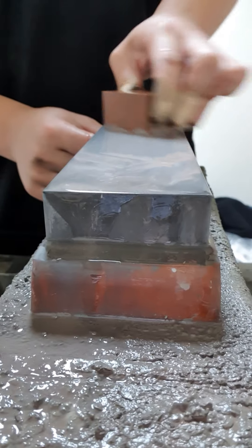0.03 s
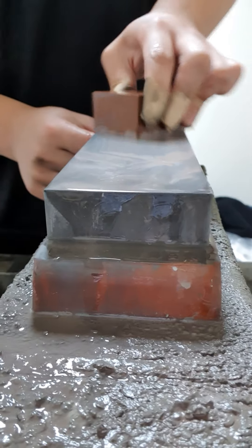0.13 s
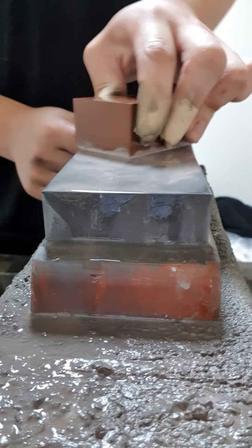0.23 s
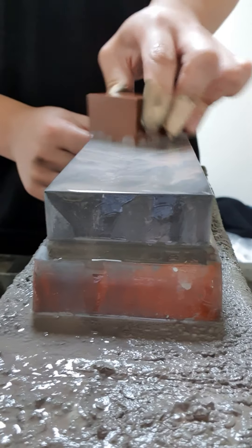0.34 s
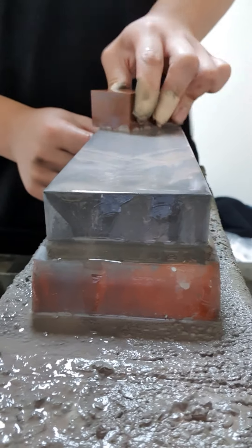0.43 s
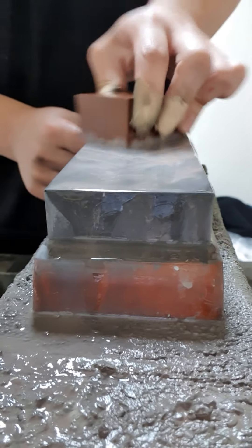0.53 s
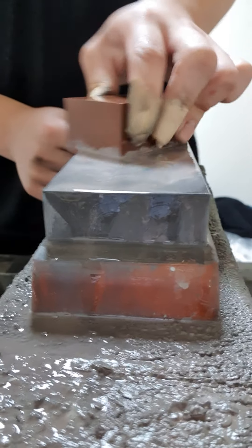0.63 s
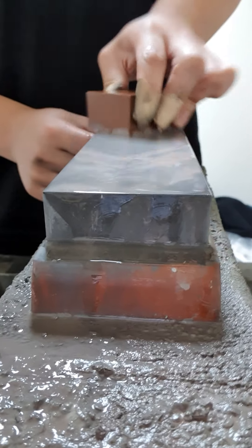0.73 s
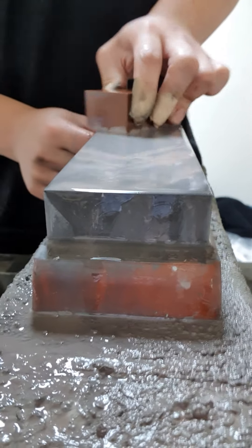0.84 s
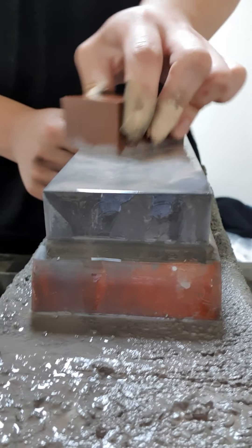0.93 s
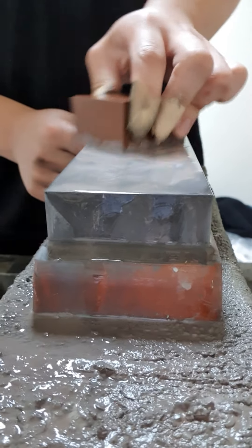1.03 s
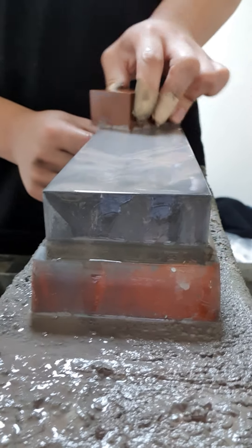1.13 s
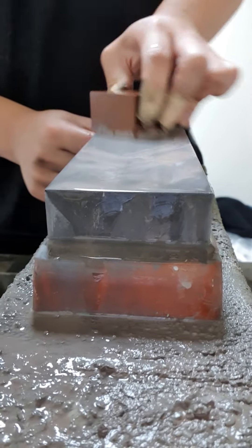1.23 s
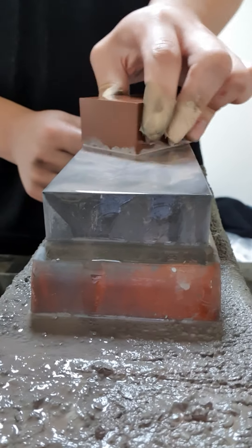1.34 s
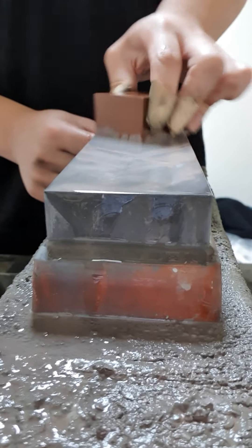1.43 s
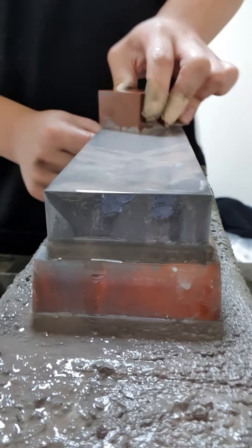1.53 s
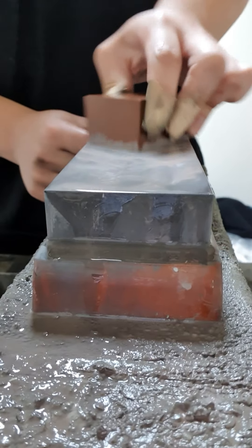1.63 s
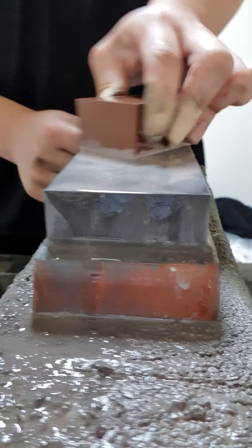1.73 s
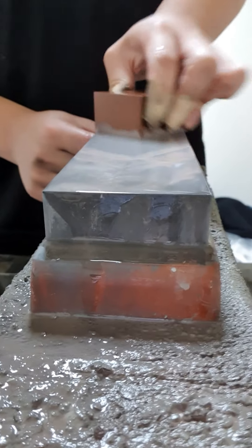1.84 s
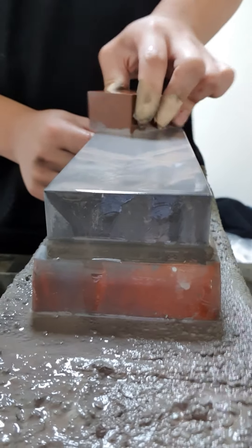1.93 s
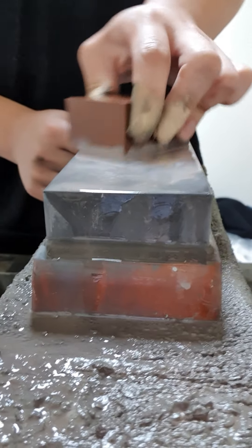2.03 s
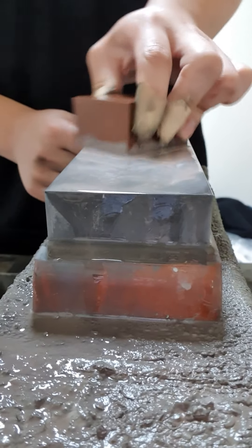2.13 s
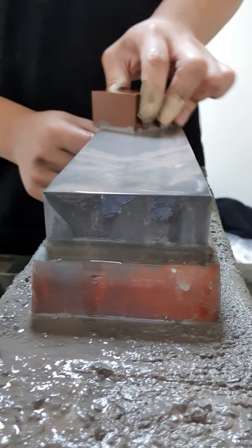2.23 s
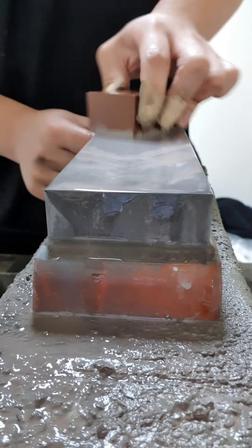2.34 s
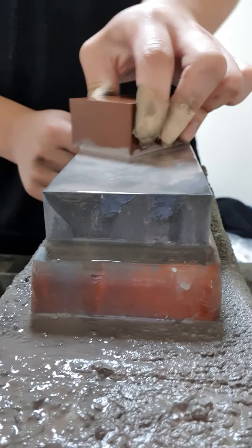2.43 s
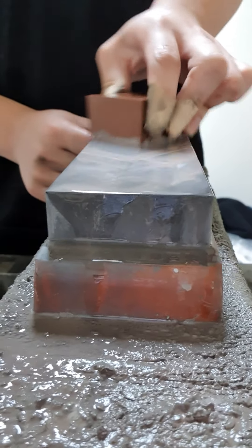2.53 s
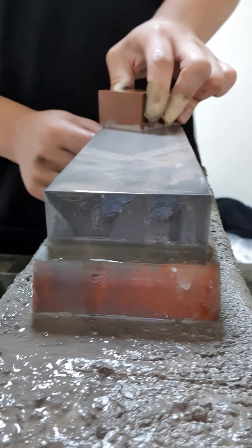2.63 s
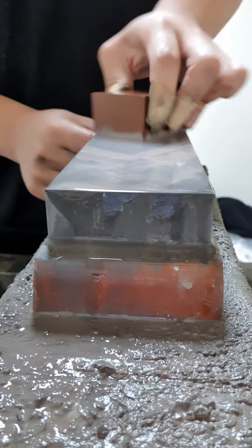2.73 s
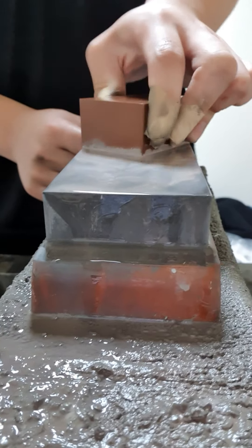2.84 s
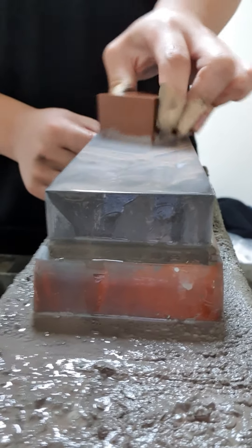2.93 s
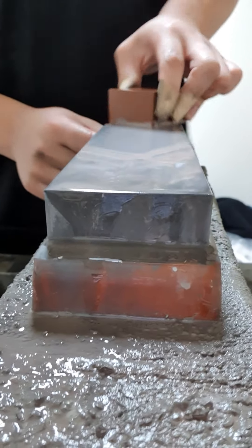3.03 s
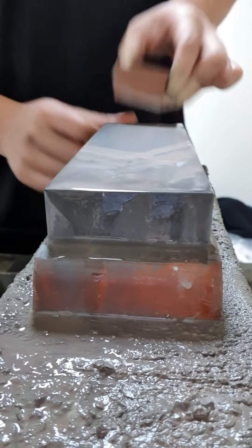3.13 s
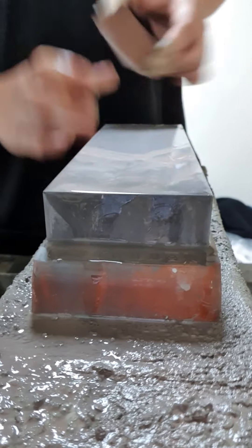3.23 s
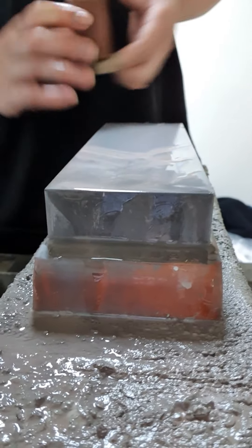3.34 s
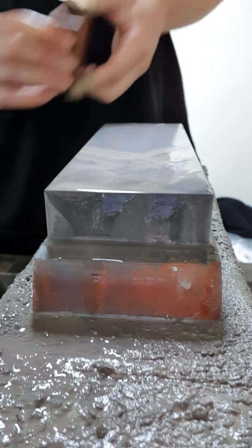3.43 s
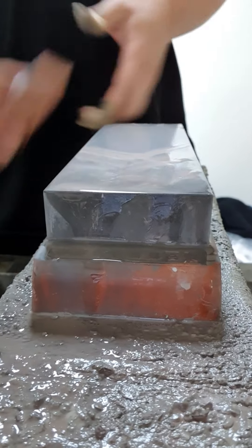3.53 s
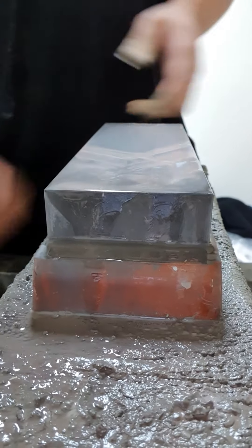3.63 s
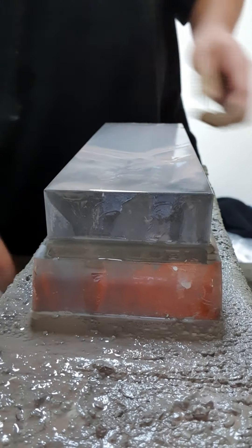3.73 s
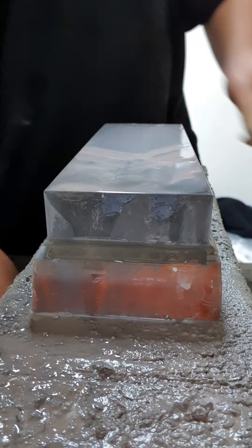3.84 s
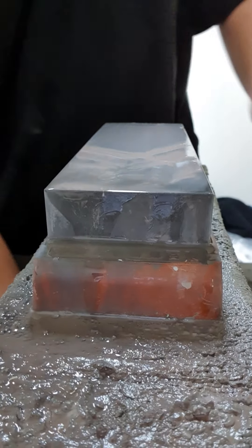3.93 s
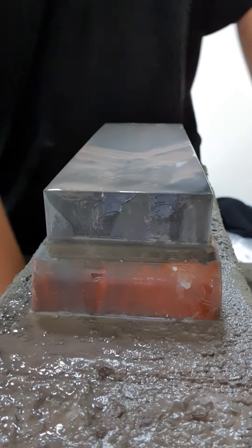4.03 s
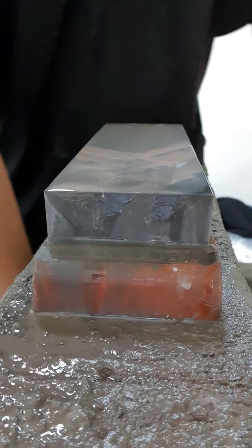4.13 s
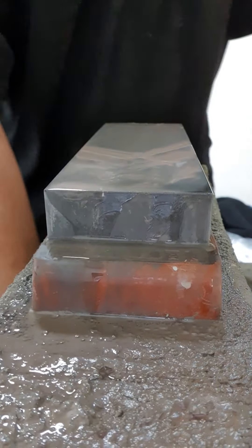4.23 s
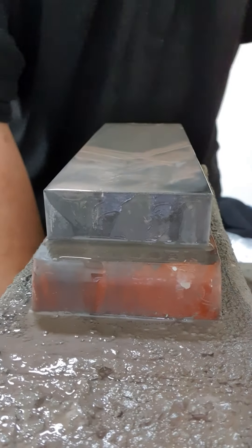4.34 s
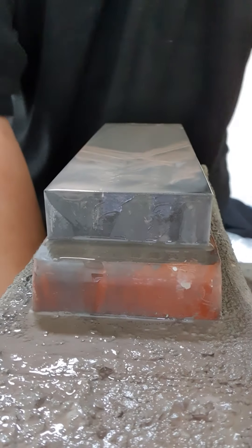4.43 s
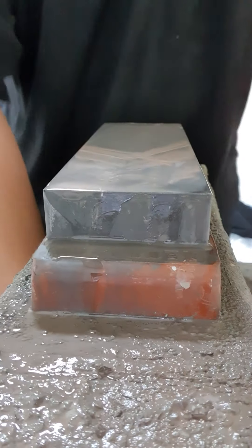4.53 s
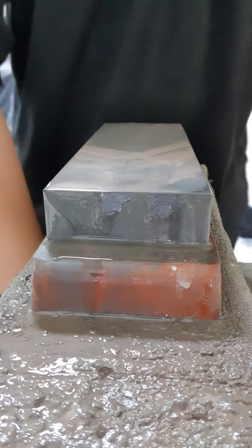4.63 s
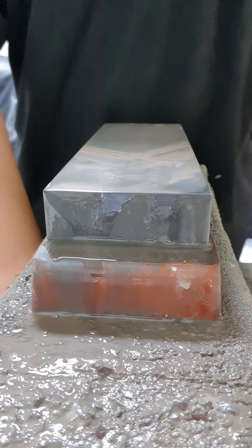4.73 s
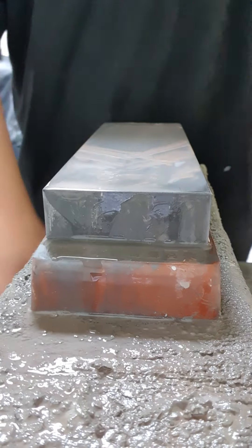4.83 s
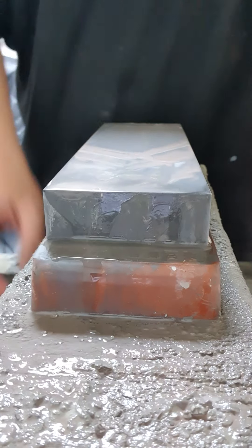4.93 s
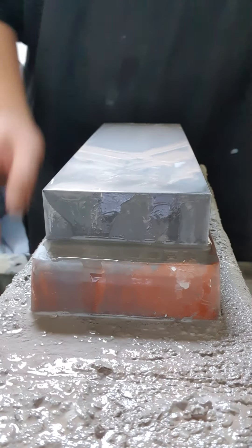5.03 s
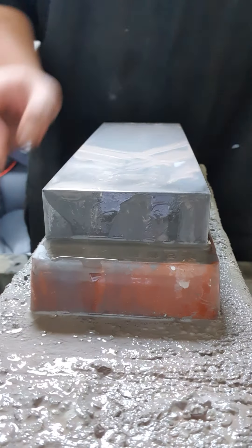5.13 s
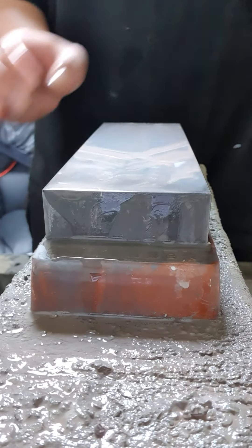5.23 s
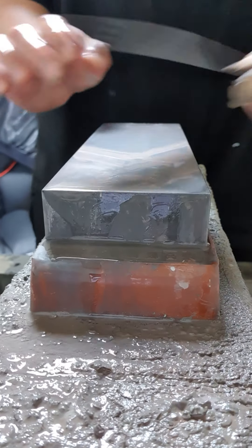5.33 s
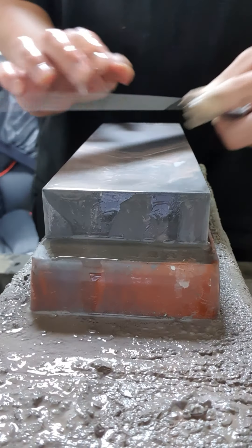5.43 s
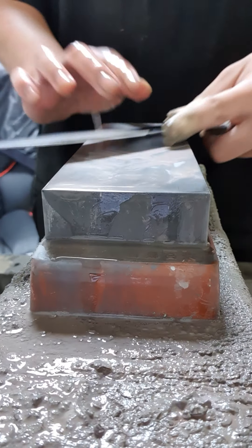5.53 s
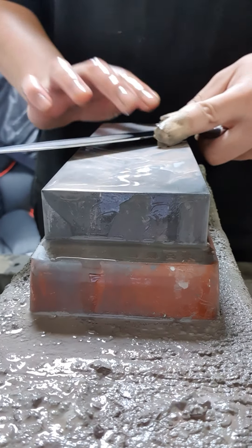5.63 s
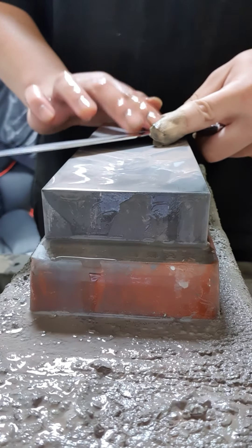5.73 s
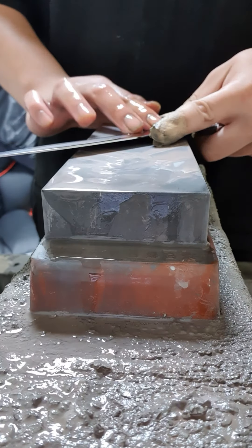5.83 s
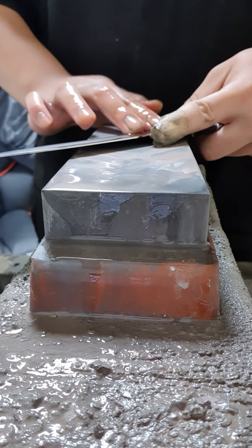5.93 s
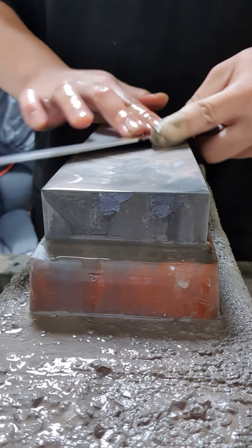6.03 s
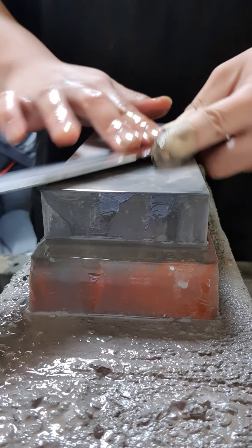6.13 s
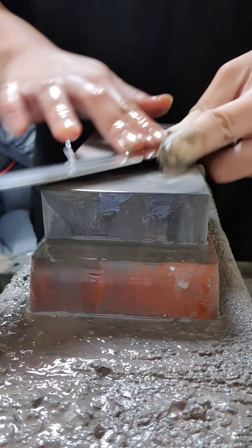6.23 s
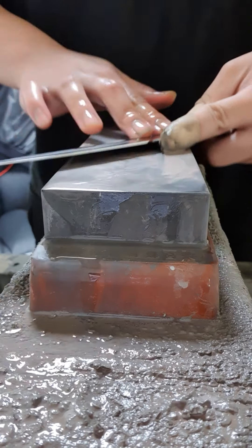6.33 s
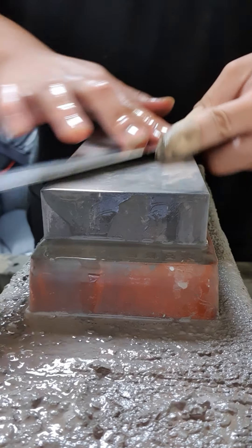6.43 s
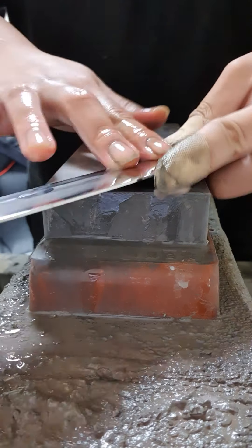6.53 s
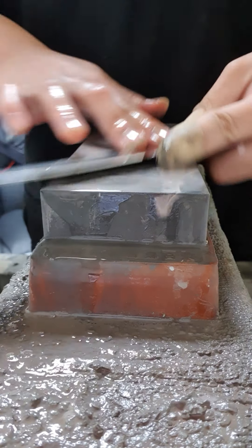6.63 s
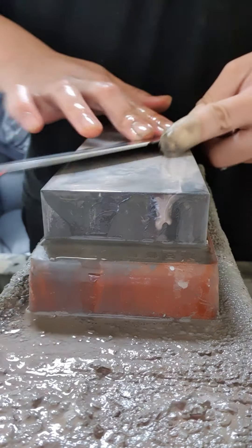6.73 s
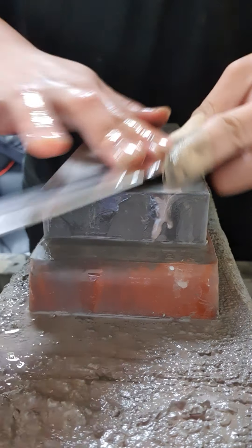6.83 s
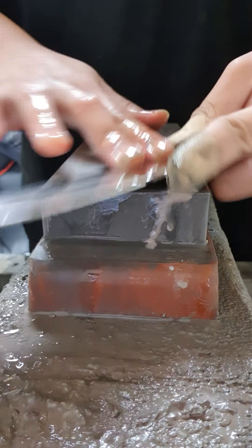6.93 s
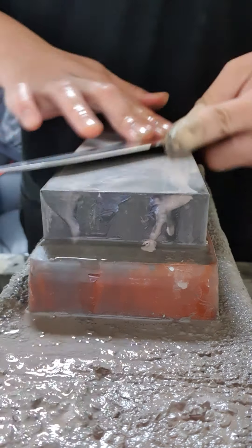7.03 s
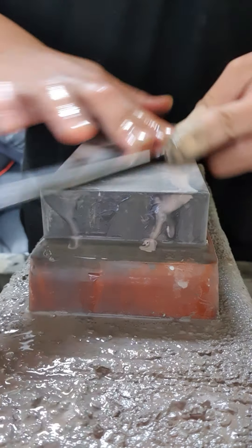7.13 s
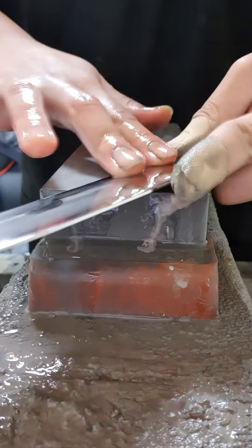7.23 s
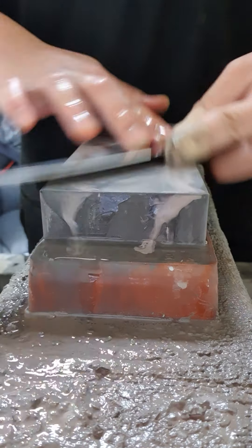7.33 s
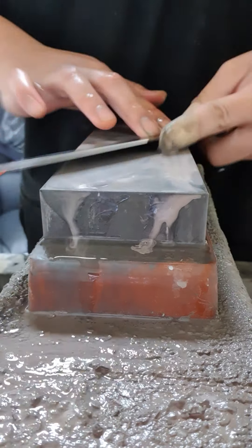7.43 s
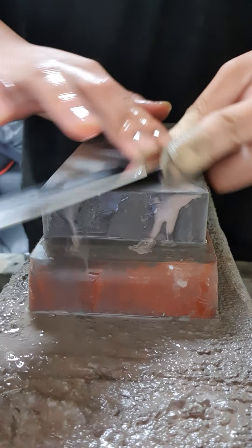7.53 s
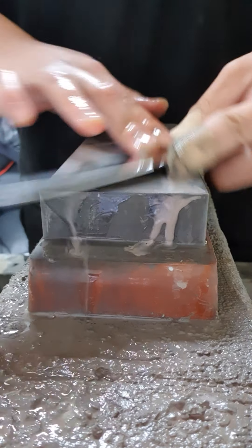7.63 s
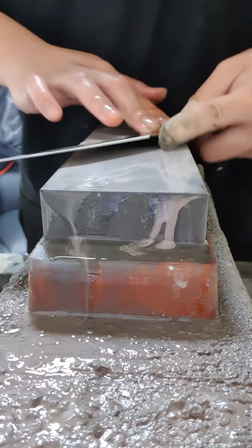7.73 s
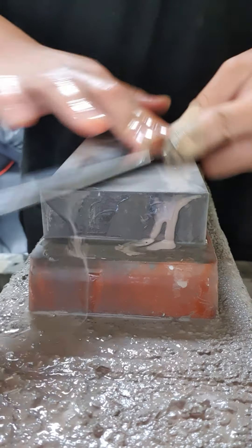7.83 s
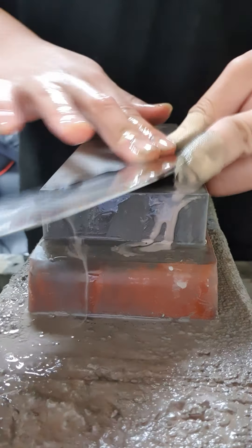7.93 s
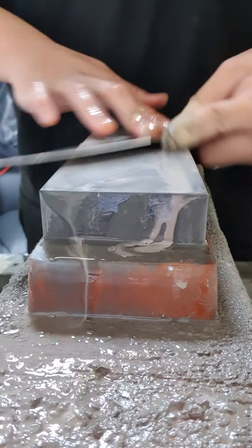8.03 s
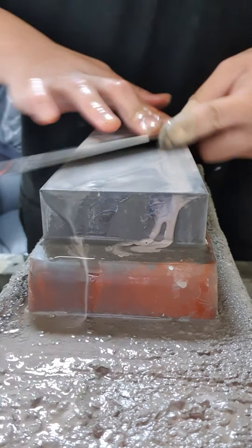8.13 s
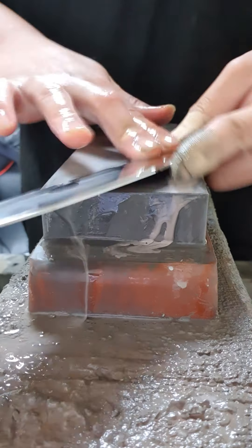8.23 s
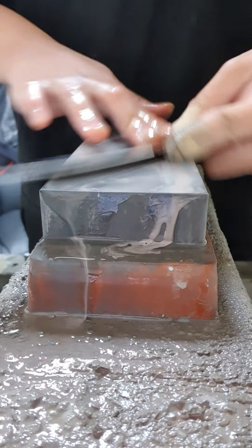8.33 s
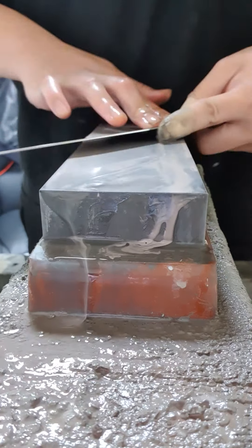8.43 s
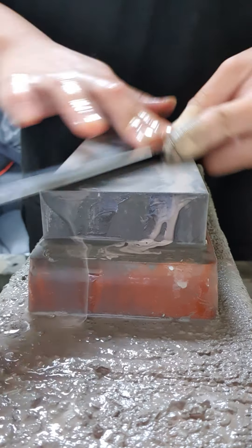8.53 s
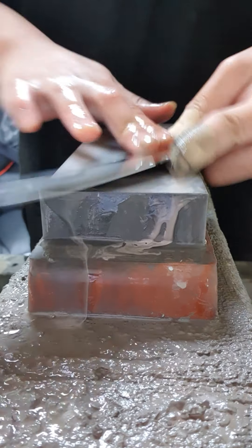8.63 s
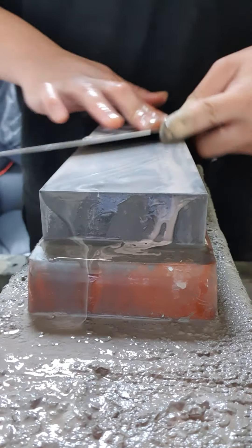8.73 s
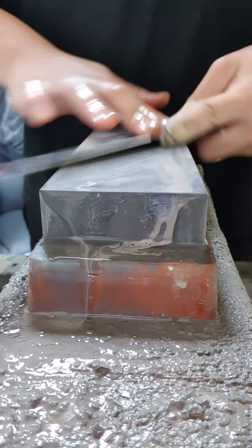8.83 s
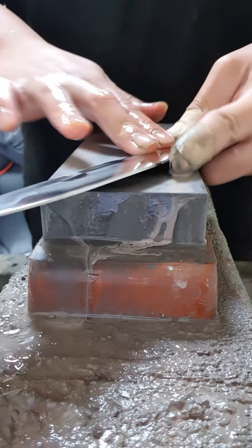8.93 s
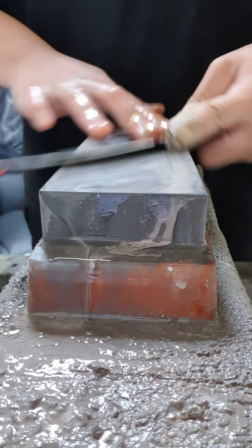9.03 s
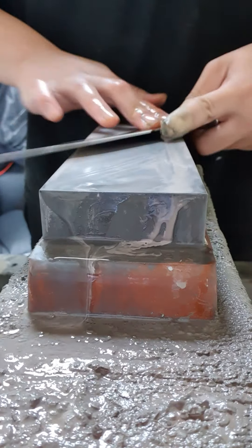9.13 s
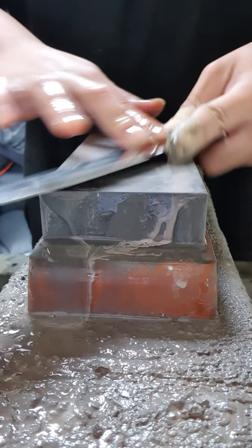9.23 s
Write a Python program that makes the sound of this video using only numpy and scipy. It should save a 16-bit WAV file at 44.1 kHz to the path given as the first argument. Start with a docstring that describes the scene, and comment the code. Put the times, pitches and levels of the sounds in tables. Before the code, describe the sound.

Close up in a small quiet room, steady gritty scrubbing of stone on stone runs about six strokes a second, heavier on alternate strokes. A lull follows with soft rustling, a barely audible thin squeak and one dull woody boom. A steel blade then rasps quickly over the wet stone, sharp and sizzling with a slight metallic ring, continuing to the end in dry-sounding close stereo.

```python
"""A small dressing stone rubs over a wet whetstone: grains fracture in coarse grinding and hissing slurry.
It is lifted off; wet hands swish, rub and touch things, a faint squeak sinks, and a thud rings the bench's modes.
Then a kitchen knife is honed in quick strokes: grit scratches the steel and rings the blade, the edge bites,
and the stone rumbles on its base. A low room tone lies under it all, heard at two microphone ports in a small room."""
import sys
import numpy as np
from scipy import signal
from scipy.fft import rfft, irfft
from scipy.io import wavfile
from scipy.ndimage import uniform_filter1d

SR = 44100
rng = np.random.default_rng(int(sys.argv[2]) if len(sys.argv) > 2 else 0)


def inscribe(sig):
    """Save sig as 16-bit PCM at rate SR to the path in sys.argv[1].

    A 1-D sig is mono; a 2-D sig holds one channel per row.
    Samples are clipped to [-1, 1] before scaling.
    """
    pcm = np.round(np.clip(np.atleast_2d(sig).T, -1, 1) * 32767)
    wavfile.write(sys.argv[1], SR, pcm.astype(np.int16))


N = 409248
T = np.arange(N) / SR  # s
FREQS = np.arange(N // 2 + 1) * SR / N  # Hz


def dressing():
    """Stone on stone: grit drives slurry hiss and stone modes, harder on the push, with catches and bumps."""
    # strokes, pull and push by turns: [turning point t/s, pressure/dB]
    dressing_strokes = [(-.04, 0.5), (0.097, -2), (.285, 1.5), (.46, 1), (.65, 1.2), (.825, .5), (1.02, .5),
                        (1.194, -0.5), (1.385, -0.1), (1.555, -0.5), (1.755, 0), (1.924, -1.6), (2.125, 0),
                        (2.3, -0.5), (2.495, 0.1), (2.678, -1.1), (2.89, -1)]
    # slurry hiss, relative: [f/Hz, level/dB]
    slurry_hiss = [(2500, -45), (3900, -20.5), (5000, -3), (6000, -4), (6800, -3.5), (7800, -5.5),
                   (8500, -3.5), (10500, -2.5), (11200, -3), (12000, -6.5), (12800, -5.5), (15500, -1)]
    # stone modes, low and high, relative: [f/Hz, width/Hz, level/dB]
    low_modes = [(558, 250, 1.5), (1090, 210, 1.5), (1725, 230, 0), (2200, 140, 0), (3367, 130, -5.5)]
    high_modes = [(5140, 250, -7), (5910, 400, 1.5), (8580, 310, -5), (10070, 550, -2), (11000, 400, 1.5),
                  (11600, 300, 0)]
    # the stone catches briefly: [peak t/s, length scale/s, f/Hz, level/dB]
    catches = [(.112, 0.024, 2430, -47), (0.635, 0.02, 610, -51.5), (0.819, 0.01, 1120, -47),
               (0.985, 0.0075, 905, -45), (2.089, 0.017, 840, -51), (2.454, 0.015, 910, -51.5),
               (2.469, 0.0098, 520, -52), (2.845, 0.015, 610, -46)]
    # the stone knocks against the whetstone: [t/s, level/dB]
    bumps = [(.299, -46), (.823, -42), (2.51, -46), (2.898, -46), (3.308, -49.5)]
    # rumble, relative: [f/Hz, level/dB]
    rumble_points = [(20, -22), (40, -10), (60, 1.5), (140, 0.5), (260, -3.5), (420, -13.5), (800, -21),
                     (2000, -37)]
    end_s = 3.254
    push_db, push_rise_db, pull_rise_db = 6.5, -1, -1.5  # rises: mid-stroke to end
    slurry_base_db, grind_base_db, rumble_db = -52, -57.5, -50
    rock_db, rock_t60_s = -46, 0.18

    k, since, until, place = strokes(dressing_strokes, end_s)
    speed = sliding(since, until, start_s=0.022, stop_s=0.056, rest=0.33)
    push, along = k % 2, 2 * place - 1
    stroke_db = np.where(push, push_db + push_rise_db * along, pull_rise_db * along)
    pressure_db = np.array(dressing_strokes)[k, 1] + stroke_db
    pressure = undb(smooth(pressure_db, span_s=0.11))
    hiss = undb(slurry_base_db) * pressure * speed
    grind = undb(grind_base_db) * pressure * speed ** 0.45

    fine = grit(per_s=10000, size_db=4, chatter_db=-0.5, patchy_db=0.65, shared=0.11)
    coarse = grit(per_s=2500, size_db=0.5, chatter_db=-1.0, patchy_db=2.5, shared=0.36)
    slurry = undb(1.0) * colour(fine, spectrum(slurry_hiss))
    slurry += undb(-8.0) * ring(coarse, high_modes, wander_db=5.5)
    grinding = undb(-4.0) * ring(coarse, low_modes, wander_db=3)
    grinding += undb(-5.0) * colour(fine, resonance(1630, 3000))
    out = hiss * slurry + grind * grinding
    out = reflect(out, np.cos(np.pi * (k + place)), lag_ms=1.7, sway_ms=0.27, gain=0.15)
    for s, length_s, hz, db in catches:
        out += undb(db) * flare(s, length_s) * colour(coarse, resonance(hz, 0.24 * hz))

    # the stone rocks as each push sets off
    rocks = [(s, rock_db + db) for s, db in dressing_strokes[1::2]]
    rocking = sum(undb(db) * fade(s, rock_t60_s, rise_s=0.0019) for s, db in rocks + bumps)
    lifting = np.clip((end_s - T) / 0.15, 0, 1)
    rumble = undb(rumble_db) * lifting ** 0.57
    low = colour(noise(shared=0.98), spectrum(rumble_points))
    return lifting ** 2.8 * out + (rumble + rocking) * low


def honing():
    """Steel on stone: grit makes a bright rasp, flaring at bites, and rings the blade; the stone rumbles."""
    # strokes: [turning point t/s, pressure/dB, rise from mid-stroke to end/dB]
    honing_strokes = [(5.985, 7.5, -1), (6.229, 2, -2.5), (6.396, 5.5, 2.5), (6.585, 2, -4),
                      (6.757, 6.5, 3.5), (6.926, 5, 4), (7.10, 4, 0), (7.275, -2, -1.5), (7.445, -3, -1.5),
                      (7.617, -2, 2), (7.787, 1.5, 4), (7.948, -0.5, 0.5), (8.123, -1.5, -3),
                      (8.298, -3, 0.5), (8.465, -2, -1.5), (8.635, -5, -4.5), (8.805, 0.5, -2.5),
                      (8.975, -0.8, -1.5), (9.15, 0, -2)]
    # the edge bites into the grit: [peak t/s, length scale/s, hiss level/dB]
    bites = [(6.098, 0.14, -25), (6.328, 0.035, -29.5), (6.415, 0.029, -35.5), (6.825, 0.074, -30.5),
             (7.035, 0.02, -31), (7.256, 0.011, -34.5), (7.301, 0.041, -35), (7.486, 0.034, -38),
             (7.631, 0.032, -37), (7.726, 0.025, -34.5), (7.962, 0.016, -38.5), (8.08, 0.025, -36.5),
             (8.312, 0.0092, -36), (8.437, 0.023, -32), (8.483, 0.022, -32), (8.777, 0.043, -31),
             (8.83, 0.058, -35), (8.987, 0.021, -38), (9.11, 0.042, -35.5), (9.18, 0.041, -33)]
    # edge hiss, relative: [f/Hz, level/dB]
    edge_hiss = [(2500, -42.5), (4200, -18), (5200, -13), (5900, -6.5), (7300, -5.5), (8000, -7.5),
                 (8600, -3.5), (9400, -5.5), (10600, -3.5), (11300, -0.5), (11950, -1.5), (12800, -3.5),
                 (15500, -2)]
    # modes of the thin steel near the edge, relative: [f/Hz, width/Hz, level/dB]
    edge_modes = [(7060, 110, -16), (8850, 280, -9.5), (9820, 130, -7), (10300, 120, -26), (11060, 200, -4),
                  (11300, 76, -36), (11530, 270, -6.5), (14470, 200, -2.5)]
    # blade modes, relative: [f/Hz, width/Hz, level/dB]
    blade_modes = [(615, 180, -16), (1297, 190, -9.5), (1930, 174, -5), (2713, 68, -0.5), (2603, 610, 0.5),
                   (3055, 110, -3.5), (4440, 330, 1), (4790, 230, -3.5)]
    # rumble, relative: [f/Hz, level/dB]
    rumble_points = [(20, -6), (40, -14), (65, -3), (130, 3), (220, -8.5), (330, -16), (500, -28),
                     (1500, -41)]
    end_s = 9.33
    rasp_base_db, blade_base_db, rumble_db, nudge_db = -39, -54.5, -57, -51.5
    blade_follows = 0.86  # dB of ring per dB of pressure
    landing_s, settle_s = 0.051, 0.73  # edge meets stone; hand's weight settles

    k, since, until, place = strokes(honing_strokes, end_s)
    speed = sliding(since, until, start_s=0.023, stop_s=0.044, rest=0.22)
    travel = np.cos(np.pi * (k + place))
    starts_s, pressure_db, rise_db = np.transpose(honing_strokes)
    pressure = undb(smooth(pressure_db[k] + rise_db[k] * (2 * place - 1), span_s=0.013))
    hiss = undb(rasp_base_db) * pressure * speed
    grind = undb(blade_base_db) * pressure ** blade_follows * speed ** 0.69
    landing = np.clip((T - starts_s[0]) / landing_s, 0.25, 1)
    weight = np.clip((T - starts_s[0]) / settle_s, 0, 1)
    # the edge can only bite once the blade is under way
    bite = np.sqrt(sum((undb(db) * flare(s, length_s)) ** 2 for s, length_s, db in bites))
    bite = bite * np.clip(since / 0.0066, 0, 1)

    fine = grit(per_s=9200, size_db=0.5, chatter_db=1.14, patchy_db=2.1, shared=0.42)
    scratches = grit(per_s=2500, size_db=0.5, chatter_db=0.7, patchy_db=0.5, shared=0.4)
    edge_ring = bend(ring(scratches, edge_modes, wander_db=2.5), 0.008 * walk(9))
    edge = undb(-1.3) * colour(fine, spectrum(edge_hiss)) + undb(-9.5) * edge_ring
    # the fingers and the moving contact retune the blade a little
    retune = 0.02 * travel + 0.018 * walk(12)
    blade = bend(ring(scratches, blade_modes, wander_db=4.5), retune)
    rasp = np.hypot(hiss, bite) * edge
    rasp += np.hypot(grind, undb(-19.5) * bite) * weight ** 0.092 * blade
    # the underside of the blade radiates in opposite phase and echoes off the stone; the bench echoes later
    rasp = reflect(rasp, travel + 0.5 * walk(7), lag_ms=0.553, sway_ms=0.06, gain=-0.32)
    rasp = reflect(rasp, travel, lag_ms=2.6, sway_ms=0.258, gain=0.37)

    base = colour(noise(shared=0.99), spectrum(rumble_points)) * undb(1.76 * walk(20))
    # each turn of the hand nudges the stone on its base
    nudge = np.exp(-((since - 0.026) / 0.029) ** 2) * colour(noise(shared=0.85), resonance(61.8, 23))
    return landing * rasp + weight * (undb(rumble_db) * base + undb(nudge_db) * nudge)


def thud():
    """A blow sets off decaying sines, the bench's modes, and decaying noise bands, its loose parts."""
    # blows on the bench: [t/s, level/dB]
    blows = [(4.461, -19.5)]
    # bench modes, all played 1.5 dB lower: [f/Hz, level re blow/dB, t60/s]
    bench_modes = [(48, -15, .13), (161.4, -5, 0.48), (220, 2.5, 0.32), (324, -21, 0.39), (396, -35, 0.33),
                   (479, -20.5, 0.53), (580, -18, 0.23), (638, -11, 0.25), (748, -20, 0.28),
                   (917, -33, 0.22), (1183, -32.5, 0.34), (1370, -51, 0.46), (1500, -32, 0.25),
                   (2050, -32, 0.31)]
    # clatter bands: [f/Hz, level re blow/dB, t60/s]
    clatter_bands = [(65, -13.5, 0.46), (151, -14, 0.67), (280, -10, 0.44), (484, -15, 0.44),
                     (710, -24, 0.14), (1460, -26, 0.5), (2000, -30, 0.14), (5200, -54, .12)]
    out = 0
    for s, blow_db in blows:
        for hz, db, t60_s in bench_modes:
            boom = fade(s, t60_s, rise_s=0.0073) * np.sin(2 * np.pi * hz * (T - s))
            out = out + undb(blow_db + db - 1.5) * boom
        for hz, db, t60_s in clatter_bands:
            shared = 1 / (1 + (hz / 1200) ** 2)
            rattle = colour(noise(shared), resonance(hz, 0.5 * hz))
            out = out + undb(blow_db + db) * fade(s, t60_s, rise_s=0.0012) * rattle
    return out


def handling():
    """Wet hands and clothes swish and rub as filtered grit, with a few light touches and one squeak."""
    # swishes: [t/s, length/s, level/dB]
    swishes = [(3.295, 0.044, -73), (3.46, 0.027, -70), (3.638, 0.13, -58.5), (3.822, 0.073, -61.5),
               (4.092, 0.11, -58.5), (4.233, 0.21, -70), (4.48, 0.25, -65.5), (4.703, .07, -66.5),
               (4.844, 0.25, -62.5), (5.125, 0.18, -62.5), (5.372, 0.054, -61.5), (5.614, 0.13, -67),
               (5.748, 0.05, -63.5), (5.84, 0.075, -63.5)]
    # duller rubs of the hands: [peak t/s, length scale/s, level/dB]
    rubs = [(3.347, 0.09, -61), (3.49, 0.13, -69.5), (3.688, 0.069, -61.5), (3.886, 0.14, -72.5),
            (4.172, 0.046, -59.5), (5.44, 0.12, -69)]
    # swish and rub spectra, relative: [f/Hz, level/dB]
    swish_points = [(1500, -14), (3500, -14.5), (5000, -7.5), (7000, -2.5), (8500, -3.5), (10000, -7.5),
                    (15500, -8)]
    rub_points = [(150, 3), (400, 7.5), (800, 1), (1400, -3.5), (1750, -4), (2400, -11.5), (3200, -15.5),
                  (6000, -34.5)]
    # light touches of stone, water and steel: [t/s, f/Hz, width/Hz, level/dB, t60/s]
    touches = [(3.723, 8400, 3000, -49, 0.034), (4.12, 5700, 1200, -60, .12), (4.155, 1740, 400, -64, 0.27),
               (4.152, 4280, 1300, -63, 0.22), (4.33, 3000, 700, -71.5, 0.3), (4.683, 3300, 350, -62, 0.34),
               (4.715, 5500, 900, -69, 0.19), (4.925, 2920, 300, -87, .3), (5.635, 11000, 6000, -64, 0.19),
               (5.585, 7500, 3000, -71, .15), (5.775, 12000, 5000, -61, 0.19), (5.86, 2820, 250, -79, 0.56),
               (5.863, 11200, 6000, -58, 0.15), (5.181, 216, 148, -55, 0.17),
               (5.629, 200, 118, -56.5, 0.14), (5.726, 215, 119, -54, 0.13)]
    rustle_db = -79  # clothes are never quite still

    swishing = sum(undb(db) * swish(s, length_s) for s, length_s, db in swishes)
    swishing = np.hypot(swishing, undb(rustle_db)) * undb(1.1 * walk(35))
    rubbing = sum(undb(db) * flare(s, length_s) for s, length_s, db in rubs)
    fibres = grit(per_s=9000, size_db=4.5, chatter_db=1.0, patchy_db=0.5, shared=0.1)
    out = swishing * colour(fibres, spectrum(swish_points))
    out += rubbing * colour(fibres, spectrum(rub_points))
    for s, hz, width_hz, db, t60_s in touches:
        out += undb(db) * fade(s, t60_s, rise_s=0.0015) * colour(fibres, resonance(hz, width_hz))
    return out + squeak()


def squeak():
    """A thin, unsteady wet squeak: inharmonic sines swell and fade as their pitch sinks ever faster."""
    # tones: [multiple of the pitch, level/dB]
    partials = [(1, 0), (1.045, -3), (1.18, -11), (1.45, -5)]
    start_s, length_s, level_db = 4.17, 0.24, -74.5
    start_hz, fall_share = 9300, 0.16
    done = np.clip((T - start_s) / length_s, 0, 1)
    hz = start_hz * (1 - fall_share * done ** 2) * (1 + 0.005 * walk(500))
    phase = 2 * np.pi * np.cumsum(hz) / SR
    tones = sum(undb(db) * np.sin(multiple * phase) for multiple, db in partials)
    return undb(level_db + 3 * walk(40)) * np.sqrt(4 * done * (1 - done)) * tones


def room_tone():
    """Steady noise, mostly low, whose level wanders slightly."""
    # relative: [f/Hz, level/dB]
    tone_points = [(20, -21), (50, -4), (80, -6.5), (115, 7.5), (160, -8.5), (280, -11.5), (450, -26),
                   (900, -30.5), (3000, -52), (7000, -36), (15500, -47)]
    tone = colour(noise(shared=0.95), spectrum(tone_points))
    return undb(-61.5) * tone * undb(0.34 * walk(2.1))


def room(x, t60_s, wet_db):
    """A short diffuse tail of decaying noise, different at each port."""
    t = T[:SR // 2]
    tail = rng.standard_normal((2, len(t))) * np.exp(-np.log(1000) * t / t60_s) * (t > 0.006)
    tail /= np.sqrt(np.sum(tail ** 2, axis=1, keepdims=True))
    return x + undb(wet_db) * signal.fftconvolve(x, tail, axes=1)[:, :N]


def strokes(table, end_s):
    """Which stroke is under way, the seconds since and until a turn, and the share of the stroke done."""
    turns_s = np.append([row[0] for row in table], end_s)
    k = np.clip(np.searchsorted(turns_s, T) - 1, 0, len(table) - 1)
    since = np.maximum(T - turns_s[k], 0)
    until = np.maximum(turns_s[k + 1] - T, 0)
    return k, since, until, since / (since + until)


def sliding(since, until, start_s, stop_s, rest):
    """Relative speed of the hand: it sets off quickly and slows to the share rest at each turn."""
    speed = np.clip(since / start_s, 0, 1) * np.sin(np.pi / 2 * np.clip(until / stop_s, 0, 1)) ** 2
    return (since * until > 0) * (rest + (1 - rest) * speed)


def grit(per_s, size_db, chatter_db, patchy_db, shared):
    """Grains fracture one by one, bunched by fast stick-slip and by patches in the slurry."""
    hits = rng.random((3, N)) < per_s / SR
    sizes = undb(size_db * rng.standard_normal((3, N)))
    grains = hits * rng.choice([-1, 1], (3, N)) * sizes
    return ports(grains, shared) * undb(chatter_db * walk(700) + patchy_db * walk(70))


def ring(x, modes, wander_db):
    """Grit rings a body's modes; they share its energy and take turns as the contact point crosses their nodes."""
    drive = rfft(x)
    sound, power = 0, 0
    for hz, width_hz, db in modes:
        gain = undb(db + wander_db * walk(16))
        sound = sound + gain * irfft(drive * resonance(hz, width_hz), N)
        power = power + gain ** 2 * width_hz
    return unit(sound / np.sqrt(power))


def bend(x, share):
    """Shift all frequencies up or down by a changing share."""
    index = np.arange(N)
    drift = np.cumsum(share)
    return np.array([np.interp(index + drift - drift.mean(), index, side, period=N) for side in x])


def reflect(x, travel, lag_ms, sway_ms, gain):
    """An echo off a near surface: its path changes along the stroke and sweeps a comb through the sound."""
    lag = (lag_ms + sway_ms * travel) * SR / 1000  # samples
    index = np.arange(N)
    echo = np.array([np.interp(index - lag, index, side) for side in x])
    return (x + gain * echo) / np.hypot(1, gain)


def fade(start_s, t60_s, rise_s):
    """Envelope of a blow: a quick swell and an exponential decay."""
    age = np.maximum(T - start_s, 0)
    return (1 - np.exp(-age / rise_s)) * np.exp(-np.log(1000) * age / t60_s)


def flare(peak_s, length_s):
    """A short swell that comes faster than it goes."""
    age = (T - peak_s) / length_s
    return np.exp(-np.minimum(np.where(age < 0, 4.5, 1.6) * age ** 2, 50))


def swish(start_s, length_s):
    """Envelope of a swish: attack, a sagging hold, release."""
    attack_s, sag_db, release_s = 0.032, -4, 0.037
    age = np.maximum(T - start_s, 0)
    release = np.exp(-np.minimum(np.maximum(age - length_s, 0) / release_s, 50))
    return np.minimum(age / attack_s, 1) * undb(sag_db * np.minimum(age / length_s, 1)) * release


def noise(shared):
    """Smooth stereo noise."""
    return ports(rng.standard_normal((3, N)), shared)


def ports(three, shared):
    """One sound that reaches both ports, the right one later, plus what each hears alone."""
    lag = 11  # samples
    shared = np.clip(shared, 0, 1)  # share of power
    both = np.array([three[0], np.roll(three[0], lag)])
    return np.sqrt(shared) * both + np.sqrt(1 - shared) * three[1:]


def walk(rate_hz):
    """Random wander with spread 1: straight lines between rate_hz knots a second."""
    knots = rng.standard_normal(N // 8)
    return 1.22 * np.interp(T * rate_hz, np.arange(len(knots)), knots)  # 1.22 undoes the loss between knots


def resonance(hz, width_hz):
    """Response of one resonance with steep skirts."""
    return 1 / (1 + 1j * (FREQS ** 2 - hz ** 2) / (1.5 * width_hz * (FREQS + 1))) ** 2


def spectrum(points):
    """Gain at every frequency from (Hz, dB) points."""
    hz, db = np.transpose(points)
    return undb(np.interp(np.log(FREQS + 1), np.log(hz), db))


def colour(x, gain):
    """Filter, then scale to rms 1."""
    return unit(irfft(rfft(x) * gain, N))


def smooth(x, span_s):
    """Running mean over a short time."""
    return uniform_filter1d(x, int(span_s * SR) + 1)


def unit(x):
    """Scale to rms 1."""
    return x / np.sqrt(np.mean(x ** 2))


def undb(db):
    """Decibels to gain."""
    return 10 ** (np.asarray(db) / 20)


def scene():
    """Strokes and handling with the room's tail, the thud without it, over a low room tone."""
    work = dressing() + honing() + handling()
    return room(work, t60_s=0.41, wet_db=-9.0) + thud() + room_tone()


def record(dry):
    """Each port colours the treble in its own way; the deepest bass is lost and the top is cut steeply."""
    # difference between the ports: [f/Hz, left minus right level/dB]
    port_points = [(100, -0.5), (400, 0), (700, -4), (1300, -1), (2000, 1.5), (8000, 0.5), (8500, 7),
                   (10700, 9.5), (11400, 7), (13000, -1.5), (14000, 12), (15500, 6)]
    low_cut_hz, top_hz = 38, 15850
    tilt = np.sqrt(spectrum(port_points))
    gains = np.array([tilt, 1 / tilt]) / np.sqrt((tilt ** 2 + tilt ** -2) / 2)
    heard = irfft(rfft(dry) * gains, N)
    heard = signal.sosfilt(signal.butter(2, low_cut_hz, "high", fs=SR, output="sos"), heard)
    return signal.sosfilt(signal.ellip(12, 0.1, 80, top_hz, fs=SR, output="sos"), heard)


dry = scene()
out = record(dry)
inscribe(out)
```